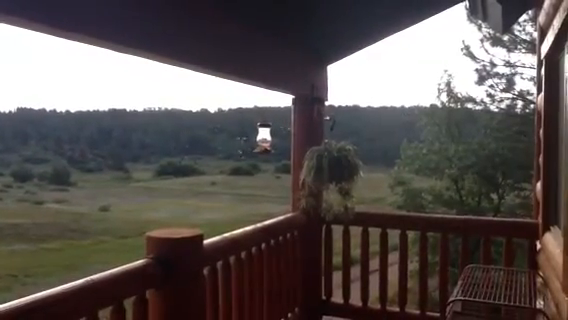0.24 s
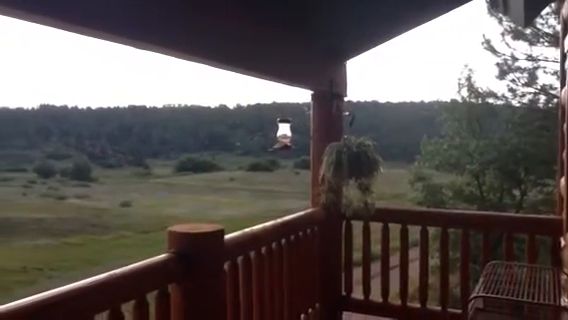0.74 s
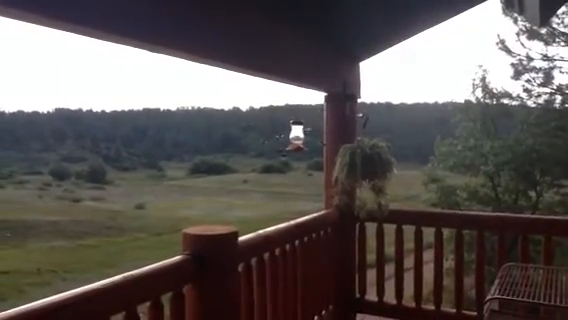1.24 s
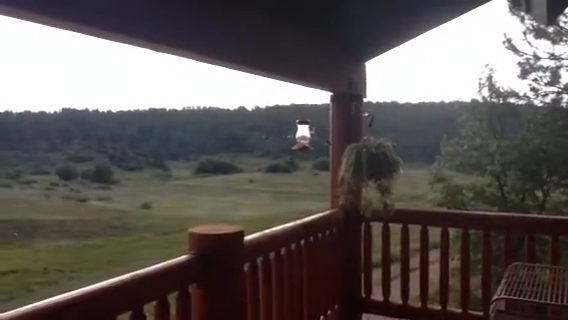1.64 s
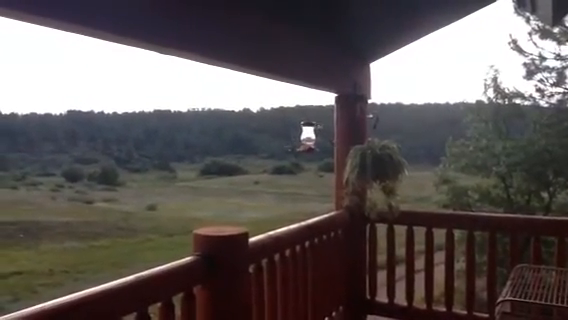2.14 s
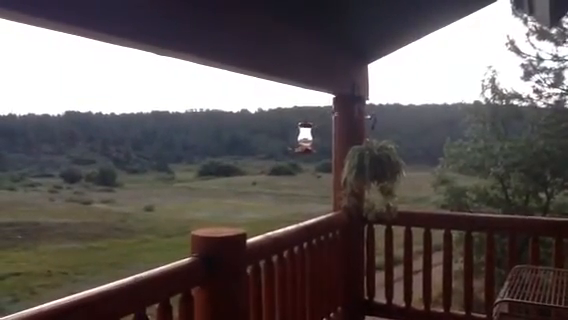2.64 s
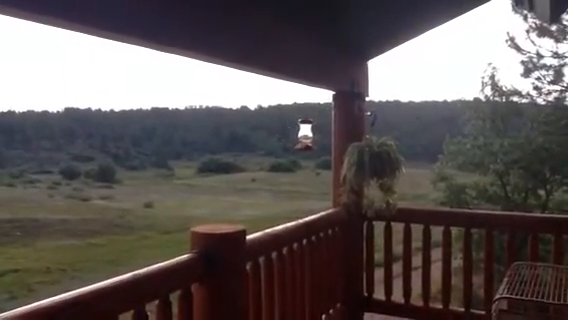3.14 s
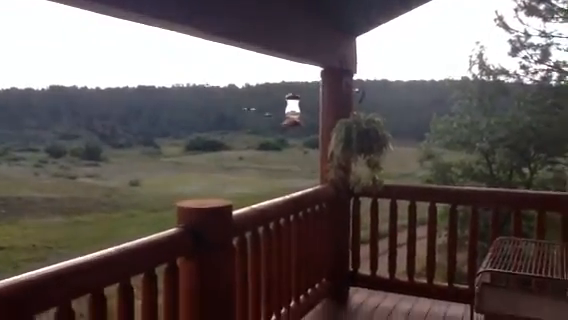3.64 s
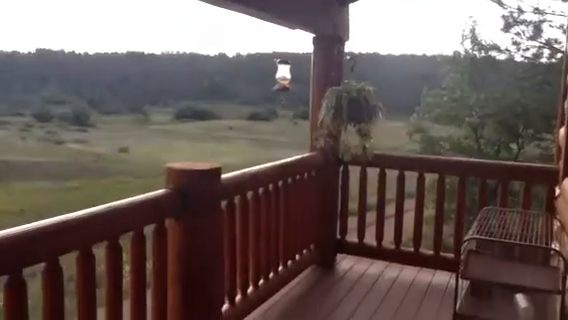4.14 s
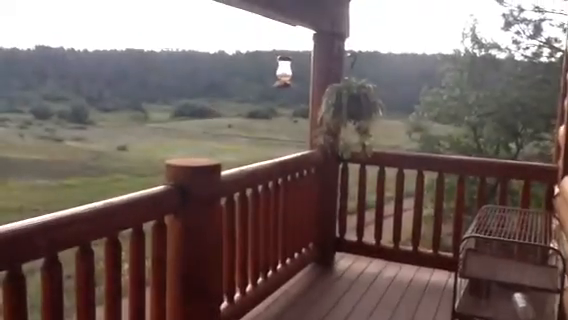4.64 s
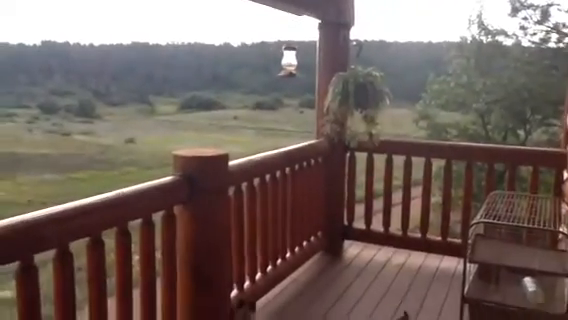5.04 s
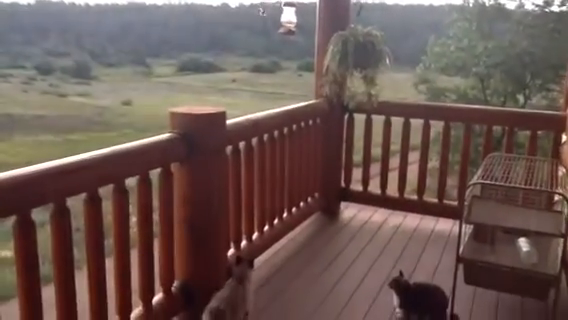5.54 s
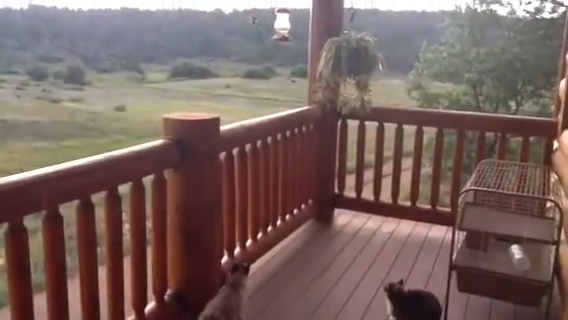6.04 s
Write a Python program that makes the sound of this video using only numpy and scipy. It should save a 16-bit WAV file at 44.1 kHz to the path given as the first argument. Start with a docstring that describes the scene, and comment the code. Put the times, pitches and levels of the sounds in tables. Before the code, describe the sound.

On a porch beside a quiet meadow, tiny birds chip and squeak excitedly, their calls dropping steeply in pitch. Squeaky, raspy outbursts crowd the first couple of seconds; dry chips follow, with close wing trills strongest around four seconds. The chatter thins and softens toward the end, closing on a faint buzz. Low wing hum and airy whirring continue over soft hiss, with short reflections from roof and deck and a slightly dulled top.

```python
"""Under a wooden porch roof beside a quiet meadow, hummingbirds squabble round a feeder.
They chip, squeak, rasp, buzz and whistle: gliding tones with overtones, coloured by throat and beak.
Wing tips trill on every beat as pulsed whistles; wings hum as wavering sine partials and stir noise-like air.
Roof, wall and deck throw calls and trills back as moving reflections and a spray of fading noise echoes.
Soft airy noise swells in the whirr three times; still air and hiss lie behind, and the top is cut steeply."""
import sys
import numpy as np
from scipy import signal
from scipy.fft import rfft, irfft, next_fast_len
from scipy.io import wavfile
from scipy.ndimage import map_coordinates

SR = 44100
rng = np.random.default_rng(int(sys.argv[2]) if len(sys.argv) > 2 else 0)


def materialize(psi):
    """Save the field psi as 16-bit PCM at rate SR to the path in sys.argv[1].

    A 1-D psi becomes a single channel; in a 2-D psi each row is a channel.
    """
    bounded = np.clip(np.atleast_2d(psi).T, -1, 1)
    quanta = np.round(bounded * 32767).astype(np.int16)
    wavfile.write(sys.argv[1], SR, quanta)


N = 276507
TIME = np.arange(N) / SR   # s

# chips, one steep downward sweep each: (start [s], fall time [s], level [dB], overtones [dB])
CHIP_CALLS = [(0.193, 0.0052, -41, 10), (.347, 0.0052, -37.5, -4), (0.536, 0.0053, -37, 4),
              (0.56, 0.007, -31.5, 0), (1.169, 0.0067, -37.5, -7), (1.236, 0.0052, -38.5, 4),
              (1.749, 0.0068, -41.5, -2.5), (1.797, 0.006, -36.5, -5), (1.912, 0.0055, -41.5, -7),
              (1.958, 0.006, -34, 7.5), (2.064, 0.0058, -34, 2.5), (2.15, 0.0082, -33, 2),
              (2.407, 0.0082, -33.5, -2), (2.463, 0.0045, -35, -9), (2.528, 0.01, -43, -7),
              (2.654, 0.0051, -36.5, 3), (2.898, 0.0074, -37.5, -4.5), (3.009, 0.01, -47, -9),
              (3.098, 0.008, -41, -4.5), (3.14, 0.0033, -44.5, -10), (3.251, 0.0075, -36, 6),
              (3.497, 0.0037, -40, 1), (3.603, 0.0063, -38.5, 15), (3.612, 0.0059, -42.5, -5),
              (3.778, 0.0053, -36, 5.5), (3.817, 0.0066, -37.5, 13), (3.85, 0.0053, -34.5, 7),
              (3.991, 0.0041, -40, 4), (4.193, 0.0029, -34.5, 14), (4.213, 0.0073, -46, 0),
              (4.318, 0.0048, -46.5, 6), (4.463, 0.0072, -40, -0.5), (4.573, 0.0038, -49, -9),
              (4.713, 0.0053, -56, -9), (4.769, 0.0056, -39.5, 3), (4.862, 0.0056, -39, 2.5),
              (5.061, 0.0083, -42.5, -6), (5.404, 0.0057, -42, -4.5), (5.605, 0.0058, -48, -3),
              (5.755, 0.0036, -43.5, -5), (5.958, 0.0053, -40, -3.5), (6.081, 0.0065, -48, -1),
              (6.124, 0.0053, -45.5, -14)]
# pitch at which the chips level out: (time [s], end pitch [Hz])
CHIP_END_HZ = [(0, 2185), (3.0, 2165), (4.5, 1842), (6.2, 2030)]
# squeaks and rasps, a held note that tumbles down:
# (start [s], hold [s], start pitch [Hz], top pitch [Hz], level [dB], overtones [dB], rasp [0-1])
SQUEAK_CALLS = [(0.292, 0.027, 6260, 6060, -25.5, 0.5, 0.03), (0.409, 0.067, 4910, 7240, -32, -2, 0.8),
                (0.653, 0.0069, 4340, 4450, -29, 7, 0.14), (0.776, 0.039, 5690, 7250, -29.5, -3, 0.79),
                (.934, 0.011, 4740, 4920, -29, 4.5, 0.3), (1.088, 0.031, 5700, 7770, -27, -1, 0.68),
                (1.249, 0.0071, 4880, 5000, -26.5, 3.5, 0.07), (1.422, 0.043, 5580, 7670, -28.5, -4, 0.7),
                (1.594, 0.0037, 5660, 5480, -26.5, 3, 0.33), (1.661, 0.0052, 3650, 3600, -30.5, 8, 0.2),
                (3.663, 0.029, 5100, 6000, -32, 7.5, 0.44), (4.102, 0.021, 5100, 5540, -39, -1.5, 0.21),
                (4.262, 0.023, 7700, 7710, -40, -3.5, 0.45), (4.614, 0.022, 7900, 7380, -49, 6, 0.3)]
# chatter, chips run together: (start [s], end [s], chips [1/s], level [dB])
CHATTER_RUNS = [(0, 0.034, 128, -38), (0.399, 0.427, 106, -36), (0.719, 0.755, 109, -32.5),
                (1.009, 1.054, 98, -33), (1.336, 1.383, 125, -32.5), (3.79, 3.854, 113, -46.5)]
# buzzes, a note swung up and down very fast: (start [s], end [s], swings [1/s],
# centre [Hz], swing [Hz], sag [Hz], level [dB], overtones [dB])
BUZZ_CALLS = [(0.06, 0.202, 109, 8300, 1240, 352, -28, -2), (3.264, 3.396, 119, 7800, 1560, 403, -33, 4),
              (6.151, 6.28, 110, 7580, 1030, 197, -44, -2.5)]
# soft low whistles, mostly the slack ends of calls: (start [s], length [s], end pitch [Hz], level [dB])
WHISTLE_CALLS = [(0.574, 0.04, 1840, -52), (0.829, 0.029, 1744, -59), (1.141, 0.055, 1767, -50.5),
                 (1.485, 0.042, 1700, -50.5), (3.508, .039, 1455, -60.5), (3.854, 0.042, 1616, -61),
                 (4.197, 0.046, 1850, -62), (4.290, 0.049, 1883, -61), (4.478, 0.047, 1480, -61.5),
                 (4.963, 0.033, 1476, -56.5), (5.052, 0.034, 1563, -58), (5.543, 0.03, 1480, -58)]
# what throat and beak let through: (frequency [Hz], level [dB])
THROAT_RESPONSE = [(1500, -13.5), (2300, -8), (3500, -10), (5000, -5.5), (7000, 0), (9000, 1.5),
                   (11000, -3.5), (15000, -11.5)]

# a trilling bird flies close by: (start [s], length [s], middle pitch [Hz], level [dB])
CLOSE_PASSES = [(2.0, 0.21, 10070, -48.5), (2.585, 0.078, 9700, -51.5), (3.698, 0.057, 9950, -42.5),
                (3.874, 0.21, 9530, -43.5), (4.13, 0.26, 9620, -46), (4.726, .13, 10230, -46.5),
                (5.129, 0.069, 9930, -51), (5.236, .15, 10080, -47), (6.06, 0.18, 10240, -55)]
# wing trill of the birds circling the feeder: (time [s], level [dB])
FLOCK_TRILL_LEVEL = [(0, -68), (.7, -50.5), (2.0, -52), (2.9, -57.5), (3.6, -56.5), (4.0, -47), (4.5, -51),
                     (5.2, -58), (5.9, -62.5), (6.27, -81)]
# faint far-off notes, most near 4.5 kHz and a low one at 2 kHz:
# (start [s], length [s], middle pitch [Hz], level [dB])
DISTANT_NOTES = [(3.163, 0.11, 4600, -54.5), (3.29, 0.24, 2020, -69), (3.51, 0.044, 4560, -49),
                 (4.90, 0.078, 4570, -58.5), (5.66, 0.096, 4470, -58.5), (5.811, 0.058, 4600, -63)]
# short swells of the low wing hum: (middle [s], length [s], middle pitch [Hz], level [dB])
HUM_SWELLS = [(.08, .22, 198.3, -60), (.35, .18, 210.3, -56.5), (.74, .14, 204, -58),
              (1.41, .14, 166.7, -57.5), (2.17, .16, 127, -59.5), (2.37, .14, 131.4, -60),
              (2.52, .2, 204.2, -55.5), (2.65, .14, 131.4, -59.5), (2.89, .12, 205.6, -55.5),
              (3.57, .2, 243.4, -53.5), (3.95, .18, 130, -59), (4.2, .12, 130, -60.5),
              (5.64, .14, 262.5, -58)]
# three soft swells of low, airy noise in the whirr: (middle [s], length [s], level [dB])
AIRY_SWELLS = [(1.397, 0.19, -67), (2.43, 0.13, -65.5), (3.96, 0.26, -63)]
# colour of that airy noise: (frequency [Hz], relative level [dB])
AIRY_COLOUR = [(100, -30), (300, -4), (500, -1), (800, -8.5), (1300, -15), (2500, -40)]

# porch echoes by band: (frequency [Hz], time to decay 60 dB [s], relative level [dB])
PORCH_BANDS = [(1550, 0.25, -1), (3970, 0.46, 5.5), (8600, 0.24, 4.5), (14900, 0.25, 8)]
# single reflections off post, roof and wall: (delay [s], level relative to the echo spray [dB])
PORCH_REFLECTIONS = [(.0045, -5), (.0085, -12.5), (.014, -7.5)]

# air stirred by many wings, before a 0.5 dB trim: (time [s], level [dB])
WHIRR_LEVEL = [(0, -58.5), (1.1, -60), (1.4, -57), (2.1, -60.5), (2.6, -58.5), (4.0, -57), (4.4, -61),
               (4.9, -60.5), (5.4, -58), (6.27, -63)]
# colour of the stirred air: (frequency [Hz], relative level [dB])
WHIRR_COLOUR = [(26, -66), (45, -44), (70, -35.5), (117, -5), (151, -5), (200, -1.5), (251, -2.5),
                (361, -12), (410, -13), (492, -10), (710, -21.5), (817, -20), (1300, -38), (1690, -41),
                (2860, -120)]
# hum of birds hovering at the feeder: (partial [Hz], level relative to the stirred air [dB])
HOVER_PARTIALS = [(135, -15), (187, -8.5), (228, -11.5)]
# still air and hiss: (time [s], level [dB])
HISS_LEVEL = [(0, -56), (2, -56.5), (4.2, -56), (5.6, -58), (5.95, -59.5), (6.27, -59)]
# colour of the still air and hiss: (frequency [Hz], relative level [dB])
HISS_COLOUR = [(40, -6.5), (700, 1), (1200, 2), (2500, 3), (4000, 3), (7000, 4.5), (10000, 5), (15000, 7.5)]

TUMBLE_S = 0.021              # tumble of a clean squeak; rasps take longer
BUZZ_ATTACK_S, BUZZ_RELEASE_S = 0.011, 0.04
WHISTLE_START_RATIO = 1.42    # starting pitch over end pitch
WINGBEAT_HZ = 64.5
TRILL_HZ, TRILL_WANDER_HZ, FLOCK_SIZE = 9640, 218.8, 2
TRILL_FALL = 0.0151           # share by which the pitch drops during a single note
HUM_FALL = 0.043              # share by which the hum sinks in pitch during a swell
CUTOFF_HZ = 15750


def chips(top_hz=9300, rough=0.054, dying_db=3.5, scatter=0.052):
    """Tension is let go at once: the pitch drops fast, then levels out as the note dies."""
    out, jitter = np.zeros(N), drift(4500)
    chances = rng.standard_normal(len(CHIP_CALLS))
    for (start, fall, level_db, overtones_db), chance in zip(CHIP_CALLS, chances):
        length = 4.2 * fall
        part, t = span(start, start + length)
        end_hz = np.interp(start, *np.transpose(CHIP_END_HZ)) * (1 + scatter * chance)
        hz = end_hz + (top_hz - end_hz) * np.exp(-t / fall)
        hz = hz * (1 + rough * jitter[part])
        swell = fade(t, length, 0.0035, 0.3 * length)
        swell = swell * from_db(level_db + dying_db * (1 - t / fall))
        out[part] += swell * syrinx(hz, overtones_db, slope_db=-1.5)
    return out


def squeaks(end_hz=1900, flutter_hz=350, flutter_depth=0.19, rough=0.0496, tumble_rough=0.0585):
    """The note glides to a held pitch, then tumbles; fast flutter of the membrane turns it into a rasp."""
    out, jitter, wobble = np.zeros(N), drift(2800), drift(200)
    for start, hold, start_hz, top_hz, level_db, overtones_db, rasp in SQUEAK_CALLS:
        tumble = TUMBLE_S * (1 + rasp / 2)
        length = hold + tumble
        part, t = span(start, start + length)
        climb = np.sin(np.pi / 2 * np.minimum(t / hold, 1))
        drop = np.sin(np.pi / 2 * np.clip((t - hold) / tumble, 0, 1)) ** 2
        hz = (start_hz + (top_hz - start_hz) * climb) * (1 - drop) + end_hz * drop
        flutter = rasp * np.sin(2 * np.pi * flutter_hz * t + wobble[part])
        roughness = rasp * rough + tumble_rough * np.sqrt(drop)
        hz = hz * (1 + flutter_depth * flutter + roughness * jitter[part])
        swell = fade(t, length, 0.009 + 0.26 * hold, 0.0014)
        swell = swell * from_db(level_db - 6 * flutter - 13.0 * drop)
        out[part] += swell * syrinx(hz, overtones_db * (1 - drop), slope_db=-1.0)
    return out


def chatter(top_hz=5200, end_hz=2200, rough=0.0584, flick_db=8):
    """The pitch is flicked up and falls again, over and over, each flick a separate tick."""
    out, jitter = np.zeros(N), drift(2500)
    for start, end, per_s, level_db in CHATTER_RUNS:
        part, t = span(start, end)
        cycle = t * per_s % 1
        hz = end_hz + (top_hz - end_hz) * np.exp(-4 * cycle)
        hz = hz * (1 + rough * jitter[part])
        tick_db = flick_db * (np.sin(np.pi * cycle) - 1.15)
        swell = fade(t, end - start, 0.0047, 0.0047) * from_db(level_db + tick_db)
        out[part] += swell * syrinx(hz, overtones_db=4, slope_db=-1.4)
    return out


def buzzes(rough=0.0146, turn_db=7, upper_db=1.5):
    """A whistle swings through about half an octave over a hundred times a second, loudest at the turns."""
    out, jitter, effort = np.zeros(N), drift(1500), drift(150)
    for start, end, per_s, centre_hz, swing_hz, sag_hz, level_db, overtones_db in BUZZ_CALLS:
        length = end - start
        part, t = span(start, end)
        swing = np.cos(2 * np.pi * per_s * t)
        hz = centre_hz + swing_hz * swing - sag_hz * t / length
        voice = syrinx(hz * (1 + rough * jitter[part]), overtones_db, slope_db=-6)
        throb_db = turn_db * (swing ** 2 - 0.5) + upper_db * swing + 2.0 * effort[part]
        swell = fade(t, length, BUZZ_ATTACK_S, BUZZ_RELEASE_S)
        out[part] += from_db(level_db + throb_db) * swell * voice
    return out


def whistles(rough=0.026, uneven_db=3.5):
    """With the syrinx nearly slack, a thin, almost pure note sinks to its lowest pitch."""
    out, jitter, effort = np.zeros(N), drift(600), drift(200)
    for start, length, end_hz, level_db in WHISTLE_CALLS:
        part, t = span(start, start + length)
        sink = 1 + (WHISTLE_START_RATIO - 1) * (1 - t / length) ** 2
        hz = end_hz * sink * (1 + rough * jitter[part])
        swell = from_db(level_db + uneven_db * effort[part]) * fade(t, length, 0.0039, 0.018)
        out[part] += swell * tone(hz)
    return out


def syrinx(hz, overtones_db, slope_db, count=7):
    """A whistle and its overtones, each shaped by the throat as it sweeps."""
    phase, out = 2 * np.pi * np.cumsum(hz) / SR, 0
    for k in range(1, count + 1):
        level_db = at_hz(THROAT_RESPONSE, k * hz)
        if k > 1:
            level_db = level_db + overtones_db + slope_db * (k - 2)
        audible = np.clip((18000 - k * hz) / 2000, 0, 1)   # fades out from 16 to 18 kHz
        out = out + from_db(level_db) * audible * np.sin(k * phase)
    return out / np.sqrt((1 + from_db(overtones_db) ** 2) / 2)


def flock_trill(swell_db=3, lag_s=0.0037):
    """Narrow wing-tip feathers whistle once a beat; pitch and level wander as the birds circle."""
    birds = np.zeros(N)
    for _ in range(FLOCK_SIZE):
        beat_time = TIME + lag_s * drift(2.3)
        centre_hz = TRILL_HZ + TRILL_WANDER_HZ * drift(6)
        bird = trill(beat_time, centre_hz, glide=0.172, rough=0.041, sharpness=2.4, uneven_db=1.0)
        birds += from_db(swell_db * drift(5.3)) * bird
    return from_db(in_time(FLOCK_TRILL_LEVEL)) * rms_one(birds)


def single_notes(rows, glide, rough, sharpness):
    """Single pulsed notes that swell, sink a little in pitch and fade."""
    out = np.zeros(N)
    for start, length, hz, level_db in rows:
        part, t = span(start, start + length)
        along = np.clip(t / length, 0, 1)
        centre_hz = hz * (1 - TRILL_FALL * (along - 0.5))
        voice = trill(t, centre_hz, glide, rough, sharpness, uneven_db=4.0)
        out[part] += from_db(level_db) * rms_one(np.sin(np.pi * along) ** 0.12 * voice)
    return out


def trill(t, centre_hz, glide, rough, sharpness, uneven_db):
    """A whistle that pulses at the wingbeat rate and slides down within each pulse; unit power."""
    beat = (t * WINGBEAT_HZ + 0.5) % 1 - 0.5   # place in the beat, 0 at the pulse's peak
    hz = centre_hz * (1 - glide * beat + rough * drift(2200)[:len(t)])
    stroke = np.exp(sharpness * np.cos(2 * np.pi * beat))
    stroke = stroke * from_db(uneven_db * drift(40)[:len(t)])
    return rms_one(stroke * tone(hz))


def hum_swells(waver=0.023):
    """Short swells of the low wing hum, each a wavering sine that sinks slightly in pitch."""
    out, jitter = np.zeros(N), drift(40)
    for middle, length, middle_hz, level_db in HUM_SWELLS:
        part, t = span(middle - length / 2, middle + length / 2)
        along = np.clip(t / length, 0, 1)
        hz = middle_hz * (1 - HUM_FALL * (along - 0.5) + waver * jitter[part])
        out[part] += np.sqrt(2) * from_db(level_db) * np.sin(np.pi * along) * tone(hz)
    return out


def airy_swells():
    """Soft swells of low, airy noise in the whirr, each rising and fading as half a sine."""
    out, airy_noise = np.zeros(N), coloured(AIRY_COLOUR)
    for middle, length, level_db in AIRY_SWELLS:
        part, t = span(middle - length / 2, middle + length / 2)
        out[part] += from_db(level_db) * np.sin(np.pi * t / length) * airy_noise[part]
    return out


def porch(x, wet_db, early_s, tail_db=-7, first_s=0.0013):
    """Clear reflections, a spray of echoes off rails and deck, then a tail with its own decay in each band."""
    t = TIME[:SR // 2]
    white, response = rng.standard_normal(len(t)), 0
    edges = np.geomspace(1000, 18000, 6)   # Hz
    for low, high in zip(edges, edges[1:]):
        hz = np.sqrt(low * high)
        band = signal.sosfilt(signal.butter(2, [low, high], "band", fs=SR, output="sos"), white)
        tail = from_db(tail_db - 60 * t / at_hz(PORCH_BANDS, hz))
        decay = np.exp(-t / early_s) + tail
        decay = decay * np.clip(t / first_s - 1, 0, 1)   # silent until first_s
        gain = from_db(at_hz(PORCH_BANDS, hz, axis=2))
        response = response + gain * band * decay / np.sqrt(np.sum(decay ** 2))
    echoes = signal.fftconvolve(x, response)[:N]
    for delay, level_db in PORCH_REFLECTIONS:
        path_s = delay * (1 + drift(1) / 10)   # the birds move, so each path keeps changing
        echoes = echoes + from_db(level_db) * map_coordinates(x, [(TIME - path_s) * SR], order=3)
    return (x + from_db(wet_db) * echoes) / np.sqrt(1 + from_db(wet_db) ** 2 / 2)


def hover_hum(waver=0.06, swell_db=4.0):
    """Partials of the wingbeats, wavering as the birds hover."""
    out = 0
    for partial_hz, level_db in HOVER_PARTIALS:
        partial = tone(partial_hz * (1 + waver * drift(20)))
        out = out + from_db(level_db) * rms_one(from_db(swell_db * drift(18)) * partial)
    return out


def stirred_air():
    """Many wings stir the air into a low whirr of coloured noise, with the hover hum in it."""
    return from_db(in_time(WHIRR_LEVEL) - 0.5) * (coloured(WHIRR_COLOUR) + hover_hum())


def still_air():
    """Steady coloured noise of still air and hiss, drifting slowly in level."""
    return from_db(in_time(HISS_LEVEL)) * coloured(HISS_COLOUR)


def from_db(db):
    """Decibels to gain."""
    return 10 ** (np.asarray(db) / 20)


def rms_one(x):
    """Scale to unit power."""
    return x / np.sqrt(np.mean(x ** 2) + 1e-20)


def at_hz(points, hz, axis=1):
    """Read a column of a table on a log-frequency axis."""
    points = np.array(points)
    return np.interp(np.log(np.maximum(hz, 1)), np.log(points[:, 0]), points[:, axis])


def in_time(rows):
    """Join the points of a level curve by straight lines."""
    return np.interp(TIME, *np.transpose(rows))


def tone(hz):
    """A sine that follows a moving pitch."""
    return np.sin(2 * np.pi * np.cumsum(hz) / SR)


def drift(rate):
    """Smooth chance of unit power that changes about rate times a second."""
    return rms_one(np.interp(TIME * rate, np.arange(N), rng.standard_normal(N)))


def coloured(spectrum):
    """Noise with the given colour, unit power."""
    size = next_fast_len(N)
    gain = from_db(at_hz(spectrum, np.fft.rfftfreq(size, 1 / SR)))
    return rms_one(irfft(rfft(rng.standard_normal(size)) * gain, size)[:N])


def span(start, end):
    """The samples of an event, at least 2 ms, and the time since its start."""
    first = max(int(start * SR), 0)
    last = min(int(max(end, start + 0.002) * SR), N)
    part = slice(first, last)
    return part, np.maximum(TIME[part] - start, 0)


def fade(t, length, attack, release):
    """Smooth swell and stop."""
    rise = np.sin(np.pi / 2 * np.clip(t / attack, 0, 1))
    return rise * np.sin(np.pi / 2 * np.clip((length - t) / release, 0, 1))


def scene():
    """Calls and wings in the porch, over quiet air."""
    calls = porch(chips() + chatter(), wet_db=-1.0, early_s=0.038, tail_db=-12.0)
    calls += porch(squeaks() + whistles(), wet_db=-1.5, early_s=0.025, tail_db=-3.5)
    calls += porch(buzzes(), wet_db=4, early_s=0.017, tail_db=-8.0)
    close = single_notes(CLOSE_PASSES, glide=0.15, rough=0.027, sharpness=4.3)
    far = single_notes(DISTANT_NOTES, glide=0.17, rough=0.03, sharpness=2.6)
    trilling = porch(flock_trill() + close + far, wet_db=0.0, early_s=0.0071, tail_db=1)
    wings = trilling + hum_swells() + airy_swells()
    return (calls + wings + stirred_air() + still_air())[None]


def record(dry):
    """At the microphone's end a steep elliptic low-pass cuts the top."""
    return signal.sosfilt(signal.ellip(12, 0.2, 80, CUTOFF_HZ, fs=SR, output="sos"), dry)


dry = scene()
out = record(dry)
materialize(out)
```